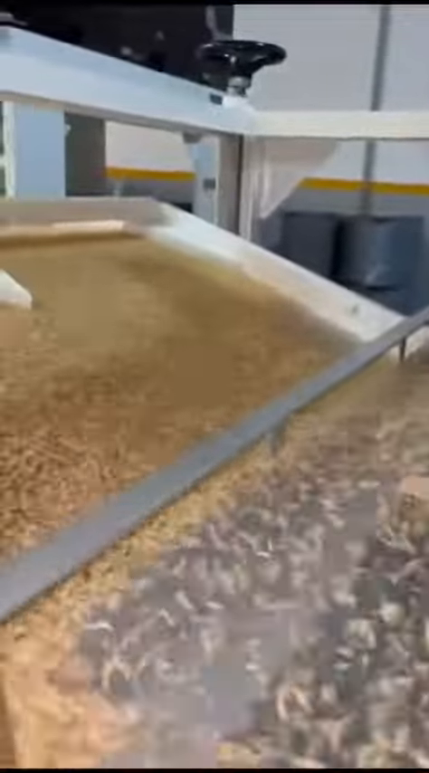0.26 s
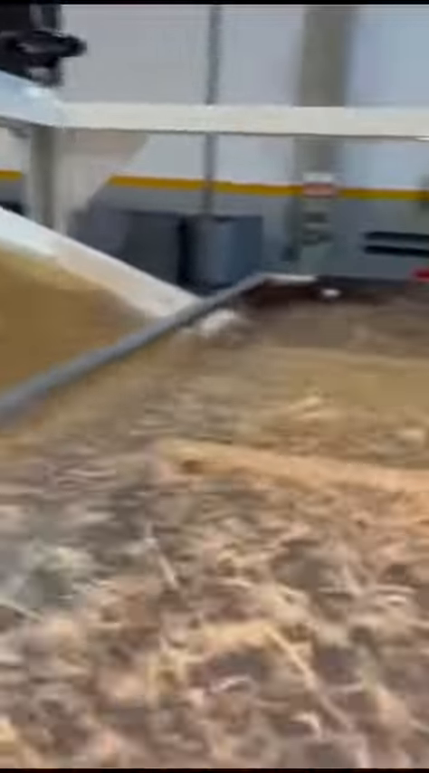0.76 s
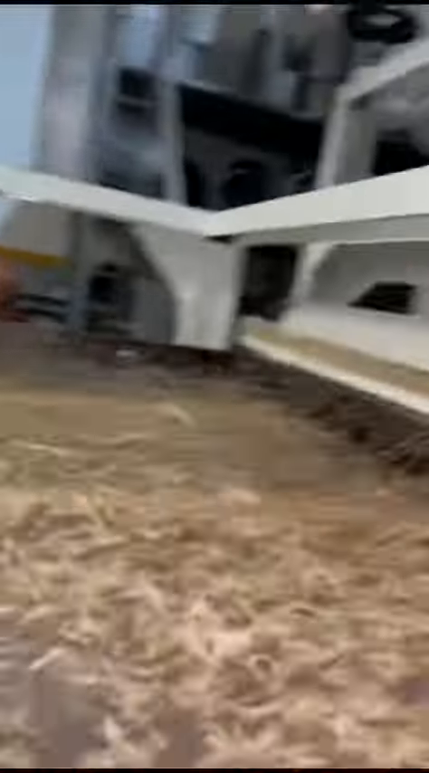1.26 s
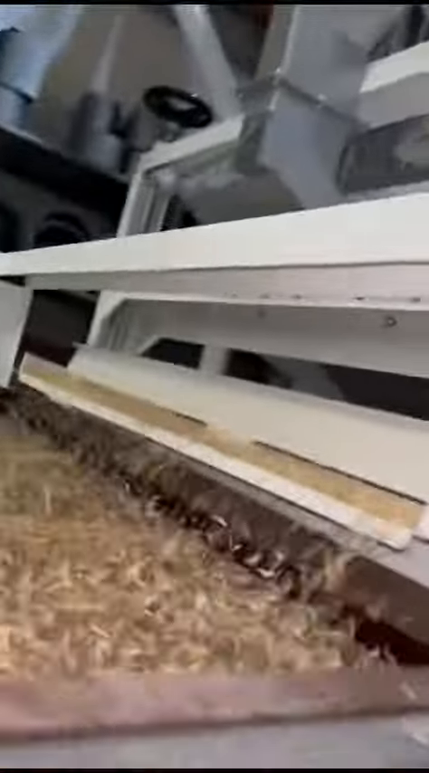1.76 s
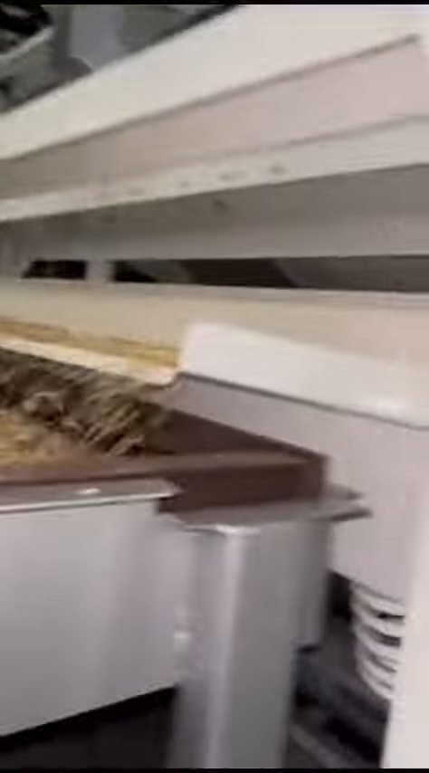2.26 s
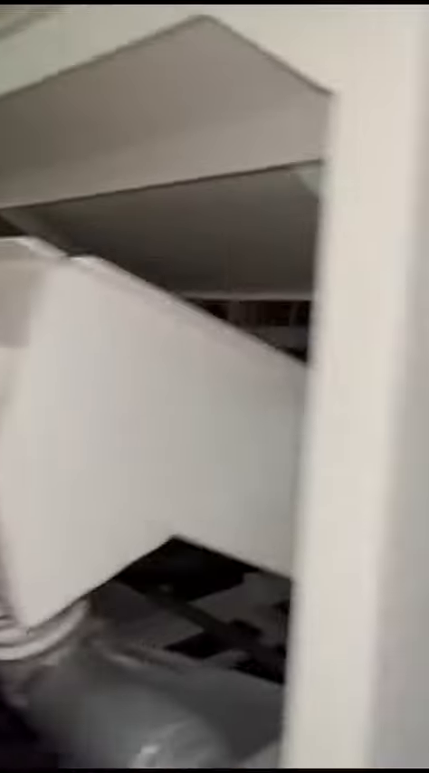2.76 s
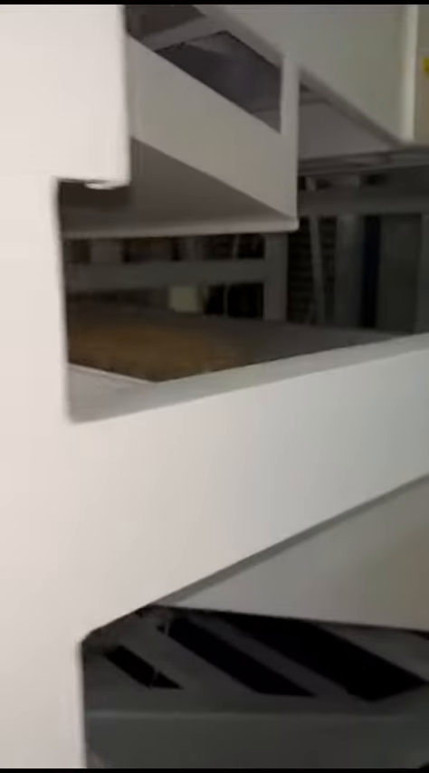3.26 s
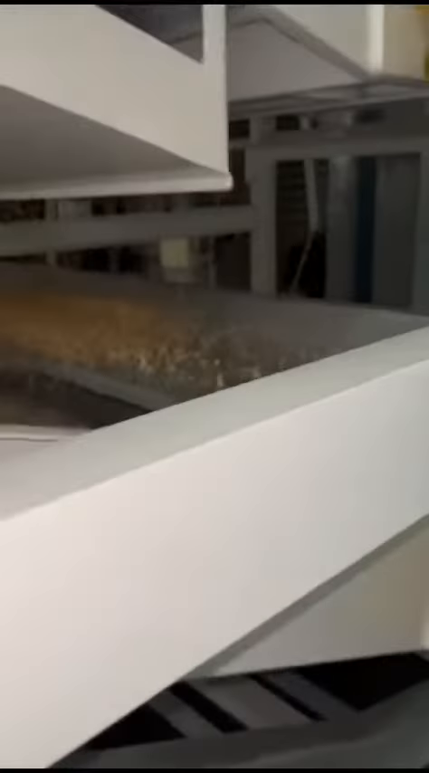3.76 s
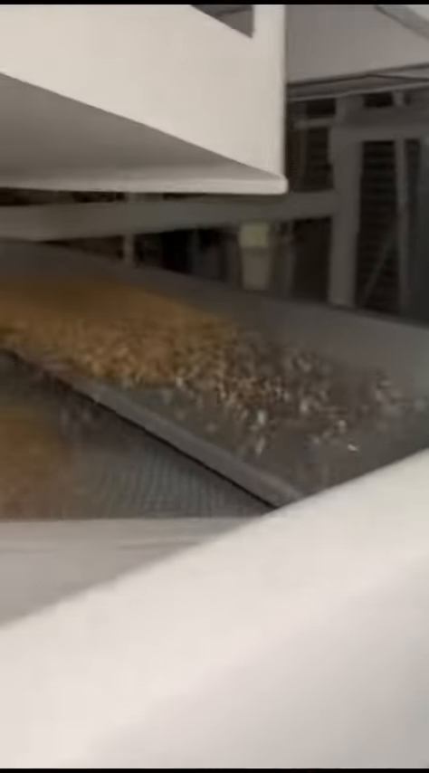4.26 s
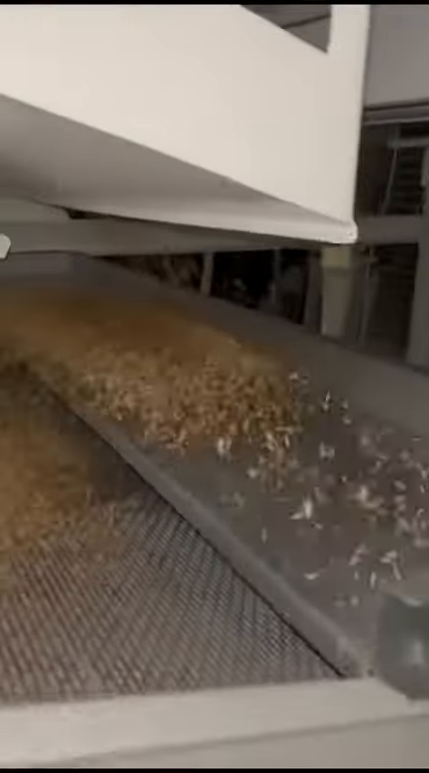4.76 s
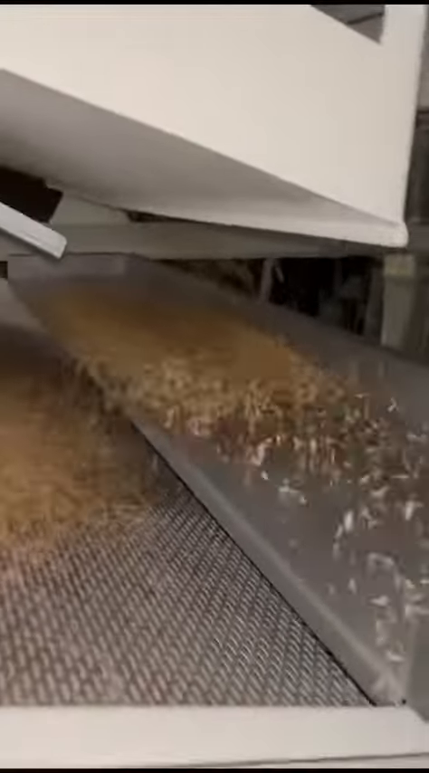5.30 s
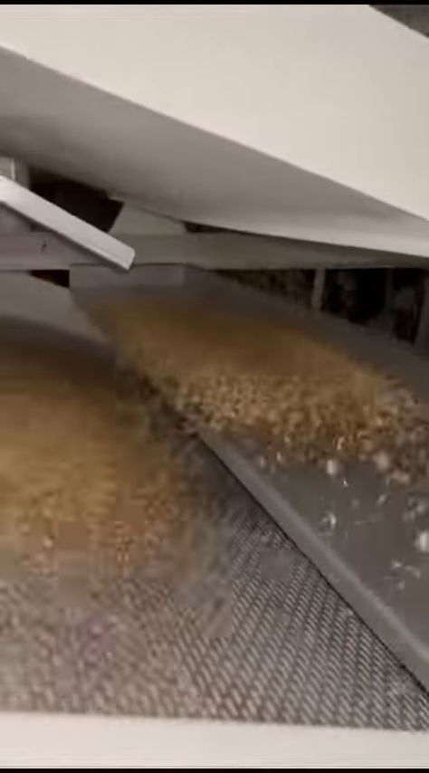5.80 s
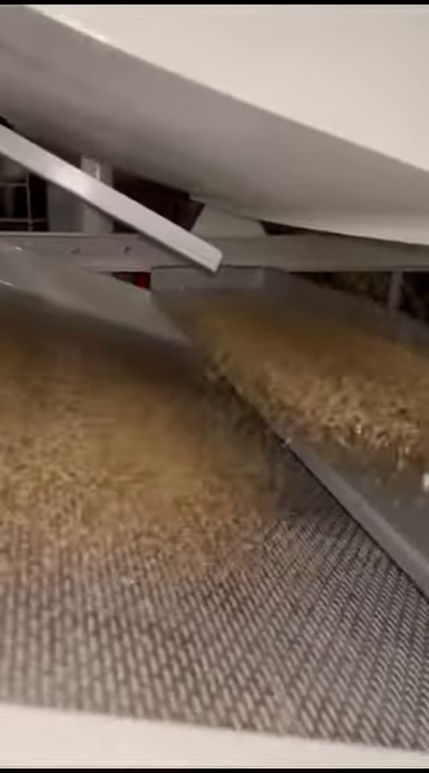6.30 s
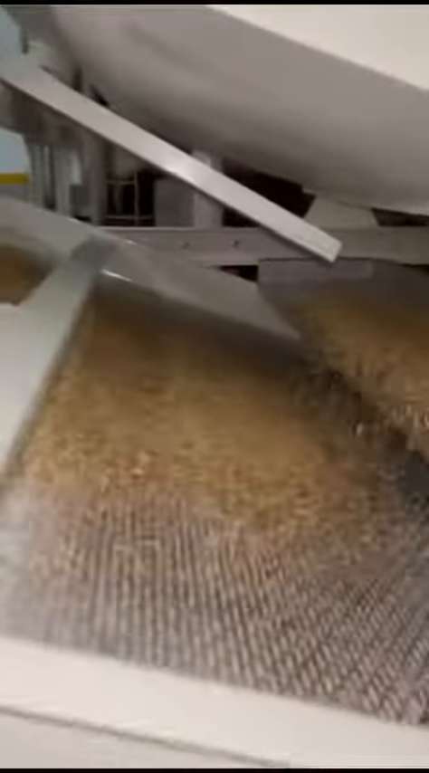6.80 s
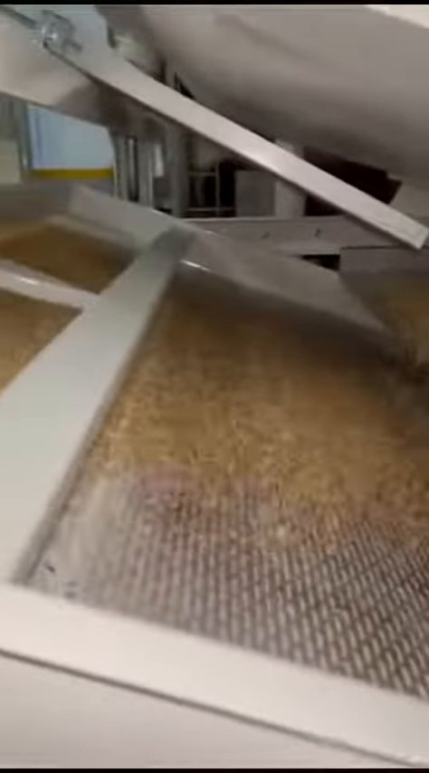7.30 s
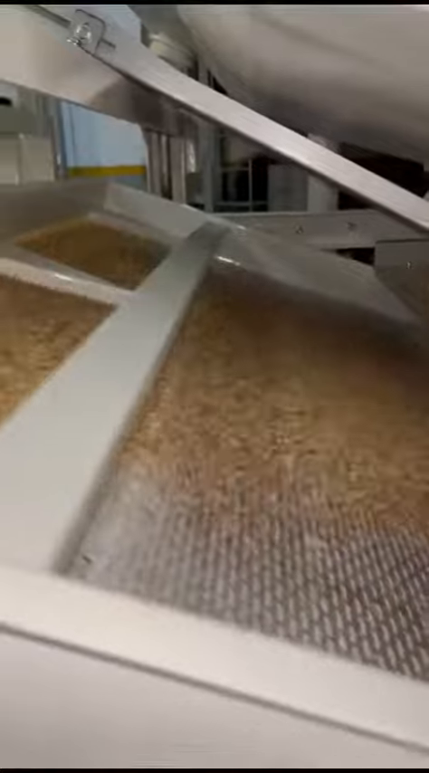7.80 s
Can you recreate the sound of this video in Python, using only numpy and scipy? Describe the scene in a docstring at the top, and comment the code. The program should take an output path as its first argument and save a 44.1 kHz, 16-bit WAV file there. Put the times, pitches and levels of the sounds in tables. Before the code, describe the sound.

Close handheld microphone walked along a vibrating grain cleaner in a loud factory hall. First, hollow steel drumming and dry husk rustle dominate; then these recede and a bright, rapid grain shower on wire mesh comes forward, fluttering about sixteen times a second. A wavering low motor hum and broad roar continue throughout, with irregular dull taps and small plate clanks.

```python
"""Factory hall: a vibrating grain sieve, heard from a phone with two microphone ports walked along it.
An unbalanced motor throws the decks about sixteen times a second and hums in harmonics of that stroke.
Kernels rain on the mesh once a stroke, the steel deck drums, and husks rustle down a chute;
these and the roar of other machines are shaped noise and scattered impacts, levelled by distance.
Loose parts knock now and then: a plate rings decaying modes, taps are short dull clacks of noise."""
import sys
import numpy as np
from scipy import signal
from scipy.fft import rfft, irfft
from scipy.io import wavfile
from scipy.ndimage import uniform_filter1d

SR = 44100
rng = np.random.default_rng(int(sys.argv[2]) if len(sys.argv) > 2 else 0)


def output_pcm(signal):
    """Save a mono or channel-first signal as 16-bit PCM at the path in sys.argv[1].

    Samples are clipped to [-1, 1] before scaling.
    """
    pcm = np.clip(np.atleast_2d(signal).T, -1, 1) * 32767
    wavfile.write(sys.argv[1], SR, np.round(pcm).astype(np.int16))


def volts_from_decibels(level):
    """Turn decibel levels (scalar or array-like) into linear amplitude factors."""
    exponent = np.asarray(level, float) / 20
    return 10 ** exponent


N = 355005
T = np.arange(N) / SR
HZ = np.fft.rfftfreq(N, 1 / SR)
PATHS = 3  # one direct, one reflected for each microphone port

STROKE_HZ = 16.463
CREST_S = 0.057  # first moment at which the grain shower is thickest

# The phone's walk past the sieve: time_s, nearest_deck_panel_m, chaff_chute_m, lower_screen_m
WALK = [(0, 0.81, 0.94, 4.5), (.4, 1.2, 0.96, 4.5), (.78, 1.05, 0.96, 4.5), (1.05, 1.42, 1.13, 2.4),
        (1.3, 2.3, 1.11, 2.6), (1.7, 2.5, 1.24, 1.64), (2.15, 3.3, 1.38, 1.84), (2.7, 4.8, 2.6, 1.59),
        (3.3, 5.3, 4.4, 1.48), (3.6, 2.7, 2.4, 1.5), (3.95, 4.3, 7.8, 1.26), (4.9, 3.1, 6.1, 1.1),
        (5.9, 3.6, 5.0, 1.04), (6.2, 2.5, 5.0, 1.08), (6.45, 4, 5.0, 1.02), (6.7, 2.16, 6.1, 1.01),
        (7.2, 3, 3.1, 1.05), (8.05, 2.17, 3.1, 0.98)]
# Turning of the phone on the way: time_s, left_minus_right_db
PHONE_TURN = [(0, -.9), (1.2, -0.4), (2.6, .2), (4.6, .5), (8.05, 0.1)]

# Spectrum of the other machines: frequency_hz, relative_level_db (per Hz)
ROAR_SPECTRUM = [(25, -35), (40, -12), (70, -2.5), (120, 0.5), (200, -1.5), (350, -2), (600, -11),
                 (1000, -16.5), (2500, -43.5), (6000, -48), (16000, -80)]
# Resonances of the sheet-steel deck: pitch_hz, width_hz, relative_level_db
DECK_MODES = [(326, 72, 0.5), (393, 100, 4), (499, 51, -10.5), (246, 100, -20), (1700, 610, -10.5)]
# Spectrum of husks and straw: frequency_hz, relative_level_db (per Hz)
CHAFF_SPECTRUM = [(300, -3), (700, -4), (1200, -3.5), (1800, -8), (2600, -5.5), (4000, -12.5), (8000, -30),
                  (16000, -61)]
# Spectrum of kernels thrown on the wire: frequency_hz, relative_level_db (per Hz)
KERNEL_SPECTRUM = [(1500, -21), (3000, -6), (5000, 4.5), (7500, 3), (10500, 1), (13000, -3.5), (15000, -4),
                   (15800, -3)]
# Spectrum of grain sliding over the wire: frequency_hz, relative_level_db (per Hz)
SLIDING_SPECTRUM = [(1000, -14), (2500, -3), (5000, 0), (7500, -7), (10500, -13), (13000, -19),
                    (15800, -20)]

# Motor harmonics: multiple of the stroke rate, one per hum partial
HUM_ORDERS = (3, 4, 5, 6, 7, 8, 9, 10, 11, 12, 13)
# Level about which each partial wavers: level_db
HUM_DB = (-51.5, -49, -43.5, -48, -44, -43.5, -46, -49, -51, -49.5, -49)
# Stretches where the hall lifts a partial, one list per order: start_s, end_s, level_db
HUM_SWELLS = [
    [(0, 1.0, -39), (1.9, 2.7, -48), (5.8, 7.6, -34.5)],
    [],
    [(4.9, 6.1, -40)],
    [(0, 1.2, -39), (1.5, 2.5, -41)],
    [(1.3, 1.9, -36.5), (2.3, 3.0, -40.5), (3.7, 6.1, -37.5), (6.9, 8.05, -36.5)],
    [(.2, .6, -38), (3.6, 4.7, -39.5), (5.2, 5.7, -32)],
    [(.2, 1.1, -39), (1.7, 2.1, -45), (5.3, 5.8, -37)],
    [(6.2, 6.8, -39)],
    [(.1, .9, -35.5)],
    [(.3, 1.2, -38.5)],
    [(3.6, 4.3, -41)],
]

# Clods and loose parts tapping the deck: start_s, level_db, ring_hz, relative_crack_db
TAPS = [(0.057, -17, 1800, -20), (0.1897, -12, 1710, -22), (0.286, -30, 1510, -10),
        (0.427, -15.5, 1630, -17), (0.6105, -15, 1840, -24), (0.7317, -10, 1780, -15),
        (0.894, -17, 1200, -16), (1.0041, -18, 1850, -19), (1.27, -16, 1700, -16), (1.6494, -20, 1450, -18),
        (1.826, -18, 1540, -19), (2.63, -23.5, 1680, -5), (3.2992, -17.5, 1300, -3.5),
        (3.54, -17, 1430, -14), (4.1585, -18, 1250, -19), (4.5743, -22, 2840, -8), (4.709, -24, 1260, -5),
        (5.429, -16.5, 1300, -9), (6.4247, -24, 1920, -12), (6.544, -23, 1790, -8)]
# A loose plate rung in short bursts: start_s, level_db
PLATE_BLOWS = [(0.246, -24.5), (0.904, -29), (1.598, -26.5), (2.199, -25), (2.826, -24.5), (3.299, -24.5),
               (3.552, -23.5), (3.61, -26.5), (4.101, -28), (4.169, -29), (4.569, -25.5), (4.71, -22.5),
               (4.799, -25), (5.369, -21.5), (5.433, -22.5), (5.991, -23), (6.098, -24), (6.597, -25.5),
               (6.715, -23), (6.771, -23.5), (7.27, -27), (7.313, -29)]
# Modes of that plate: pitch_hz, relative_level_db, decay_by_60_db_s
PLATE_MODES = [(634, -3, 0.36), (573, -13.5, 0.69), (645, -4, 0.11), (1085, -8, 0.067), (1810, -17, 0.065),
               (2080, -18.5, 0.16), (2260, -16, 0.092)]

# Phase between the microphone ports: frequency_hz, right_ahead_of_left_rad
PORT_LEAD = [(0, 0), (130, .1), (390, .66), (550, .82), (1250, .45), (1720, 0), (2400, -2), (3300, -1.2),
             (4700, 3.1), (5150, 4.4), (5970, 3.14), (7950, 0), (10170, -3.14), (12500, -6.28),
             (14760, -9.42), (17000, -12.57)]
# Share of the sound common to both ports: frequency_hz, share (0-1)
PORT_COMMON = [(0, 1), (400, .98), (800, 0.72), (1300, 0.76), (1750, 0.99), (2500, 0.78), (3300, 0.06),
               (4600, 0.07), (5300, 0.86), (5900, 0.96), (7000, 0.96), (22050, 1)]
# Balance of the ports: frequency_hz, left_minus_right_db
PORT_BALANCE = [(0, 0), (200, .3), (400, 0), (1100, -2), (1800, -.8), (3300, -2), (4300, 0), (4700, -1),
                (5800, 0)]

# Levels in dB at 1 m from each source; the hall roar is the same everywhere
HALL_DB, ROAR_CHUTE_DB, ROAR_SCREEN_DB = -34, -29, -27
DECK_DB = -17.5
CHAFF_CHUTE_DB, CHAFF_SCREEN_DB = -31, -36.5
THROWN_CHUTE_DB, THROWN_SCREEN_DB, SLIDING_DB = -33.5, -32.5, -35.5
THROWN_FALL = 2.03  # power of 1 / r from the lower screen: the frame shades the bright shower


def unit(x):
    """Scale to rms 1."""
    return x / np.sqrt(np.mean(x ** 2))


def curve(table):
    """Columns of a table, interpolated over its time_s column at every sample."""
    time_s, *columns = np.transpose(table)
    return [np.interp(T, time_s, column) for column in columns]


def colour(x, spectrum):
    """Filter x with a spectrum drawn on a log-frequency axis, then scale to rms 1."""
    hz, db = np.transpose(spectrum)
    gain = volts_from_decibels(np.interp(np.log(HZ + 1), np.log(hz), db))
    return unit(irfft(rfft(x) * gain, N))


def walk(rate_hz):
    """Random wander of rms 1: levels held 1 / rate_hz and slewed twice."""
    hold = int(SR / rate_hz)
    steps = np.repeat(rng.standard_normal(N // hold + 1), hold)
    return unit(uniform_filter1d(uniform_filter1d(steps, hold), hold)[:N])


def together(*levels_db):
    """Level of unrelated sounds heard at once: their powers add."""
    return 10 * np.log10(sum(volts_from_decibels(db) ** 2 for db in levels_db))


def patter(per_s, spread_db):
    """Scattered impacts of uneven size, drawn anew for each path."""
    hit = rng.random((PATHS, N)) < per_s / SR
    count = hit.sum()
    out = np.zeros((PATHS, N))
    out[hit] = rng.standard_normal(count) * volts_from_decibels(spread_db * rng.exponential(size=count))
    return out


def ring(x, hz, t60):
    """One mode decaying by 60 dB in t60 seconds; a unit impulse peaks near 1."""
    radius = np.exp(-np.log(1000) / (t60 * SR))
    turn = 2 * np.pi * hz / SR
    return signal.lfilter([0, np.sin(turn)], [1, -2 * radius * np.cos(turn), radius ** 2], x)


def shower(depth_db, lean, scatter_db):
    """Grain landing through each stroke, no two alike; a positive lean makes it rise faster than it falls."""
    strokes = (T - CREST_S) * STROKE_HZ + 1.4
    angle = 2 * np.pi * (strokes - .4)
    sizes = rng.standard_normal(int(strokes[-1]) + 1)
    size = uniform_filter1d(sizes[strokes.astype(int)], size=400)
    swell = np.cos(angle - lean * (1 - np.cos(angle)))
    return unit(volts_from_decibels(scatter_db * size + depth_db * swell))


def roar():
    """Other machines fill the hall: steady noise, strongest in the low range."""
    return colour(rng.standard_normal((PATHS, N)), ROAR_SPECTRUM)


def deck():
    """A dense rain of grain drums the sheet steel, exciting its damped modes."""
    # a small panel radiates little bass
    highpass = signal.butter(2, 270., "high", fs=SR, output="sos")
    blows = signal.sosfilt(highpass, patter(2500, spread_db=1.5))
    out = 0
    for hz, width_hz, db in DECK_MODES:
        t60 = np.log(1000) / np.pi / width_hz
        out += volts_from_decibels(db + 0.92 * walk(6)) * unit(ring(blows, hz, t60))
    return unit(out)


def chaff():
    """Husks and straw rustle down the chute as many small impacts, faintly in step with the stroke."""
    pace = shower(depth_db=1.0, lean=0., scatter_db=1.0)
    return colour(patter(6000, spread_db=1.5) * pace, CHAFF_SPECTRUM)


def mesh(thrown_db, sliding_db):
    """Kernels rattle on the wire: a bright shower once a stroke over a duller hiss of sliding grain."""
    pace = shower(depth_db=5.0, lean=0.58, scatter_db=0.85)
    thrown = colour(patter(12000, spread_db=-1.0) * pace, KERNEL_SPECTRUM)
    sliding = colour(rng.standard_normal((PATHS, N)), SLIDING_SPECTRUM) * volts_from_decibels(0.9 * walk(7.4))
    return thrown * volts_from_decibels(thrown_db) + sliding * volts_from_decibels(sliding_db)


def bed():
    """Steady random sound in unrelated paths: near parts fade with distance over a constant hall roar."""
    panel_db, chute_db, screen_db = -20 * np.log10(np.maximum(curve(WALK), .2))  # 1 / r
    roar_db = together(HALL_DB, ROAR_CHUTE_DB + chute_db, ROAR_SCREEN_DB + screen_db)
    chaff_db = together(CHAFF_CHUTE_DB + chute_db, CHAFF_SCREEN_DB + screen_db)
    thrown_db = together(THROWN_CHUTE_DB + chute_db, THROWN_SCREEN_DB + THROWN_FALL * screen_db)
    out = roar() * volts_from_decibels(roar_db)
    out += deck() * volts_from_decibels(DECK_DB + panel_db)
    out += chaff() * volts_from_decibels(chaff_db)
    return out + mesh(thrown_db, SLIDING_DB + screen_db)


def motor():
    """Harmonics of the unbalanced weights, each wavering a little and swelling where the hall favours it."""
    fade_s = 0.16
    out = 0
    for order, steady_db, swells in zip(HUM_ORDERS, HUM_DB, HUM_SWELLS):
        size = volts_from_decibels(steady_db + 2.5 * walk(1.43))
        for start_s, end_s, db in swells:
            rise, fall = np.tanh((T - start_s) / fade_s), np.tanh((T - end_s) / fade_s)
            size += volts_from_decibels(db) * (rise - fall) / 2
        flutter = volts_from_decibels(1.23 * walk(5))
        phase = 2 * np.pi * order * STROKE_HZ * T + 0.095 * order * walk(2.486) + 6 * rng.random()
        out += np.sqrt(2) * size * flutter * np.sin(phase)
    return out


def taps():
    """Clods and loose parts hit the deck: a heavily damped ring with a noisy tail and a brighter crack."""
    out = np.zeros(N)
    t = np.arange(SR // 16) / SR
    for start_s, db, hz, crack_db in TAPS:
        noise = rng.standard_normal(len(t))
        tap = unit(ring(noise, hz, 0.0023)) * np.exp(-t / 0.021) * 0.22
        # the crack of first contact
        tap += unit(ring(noise, 3450.0, 0.001)) * np.exp(-t / 0.011) * 0.48 * volts_from_decibels(crack_db)
        start = int(start_s * SR)
        out[start:][:len(t)] += volts_from_decibels(db) * tap[:N - start]
    return out


def plate():
    """Each blow on the loose plate rings its modes in a slightly different balance."""
    out = np.zeros(N)
    at = [int(start_s * SR) for start_s, _ in PLATE_BLOWS]
    blow_db = np.array(PLATE_BLOWS)[:, 1]
    for k, (hz, db, t60) in enumerate(PLATE_MODES):
        spread_db = 1.5 * rng.standard_normal(len(at)) if k else 0  # the main mode does not vary
        blows = np.zeros(N)
        blows[at] = volts_from_decibels(blow_db + db + spread_db)
        # the ring swells over a few ms: a scrape rather than a sharp blow
        out += ring(blows, hz, t60) - ring(blows, hz, t60 / 8)
    return out


def scene():
    """Direct sound reaches both ports with a phase lead; each port adds its own reflected share."""
    direct, *reflected = rfft(bed())
    near = rfft(motor() + taps() + plate())
    common = np.clip(np.interp(HZ, *np.transpose(PORT_COMMON)), 0, 1)
    lead = np.interp(HZ, *np.transpose(PORT_LEAD))
    balance_db = np.interp(HZ, *np.transpose(PORT_BALANCE))
    ports = []
    for side, own in zip((-1, 1), reflected):  # left, right
        shared = np.sqrt(common) * direct * np.exp(.5j * side * lead)
        # hum and knocks reach both ports whole, with less lead where little is common
        shared += near * np.exp(.5j * side * lead * common)
        port = shared + np.sqrt(1 - common) * own
        ports.append(irfft(port * volts_from_decibels(-side * balance_db / 2), N))
    turn_db = curve(PHONE_TURN)[0]
    return np.array(ports) * volts_from_decibels(np.outer([.5, -.5], turn_db))


def low_pass(x):
    """Removes everything above the highest recorded frequency."""
    return signal.sosfilt(signal.butter(12, 15910, fs=SR, output="sos"), x)


def record(dry):
    """The phone cuts the deepest bass and the top."""
    bass_cut = signal.butter(4, 42., "high", fs=SR, output="sos")
    top_cut = signal.ellip(10, .2, 70, 15660, fs=SR, output="sos")
    mix = signal.sosfilt(top_cut, signal.sosfilt(bass_cut, dry))
    return low_pass(mix)


dry = scene()
out = record(dry)
output_pcm(out)
```